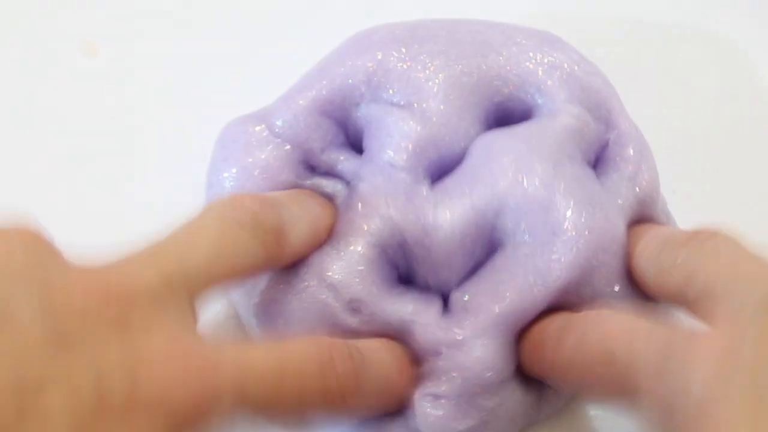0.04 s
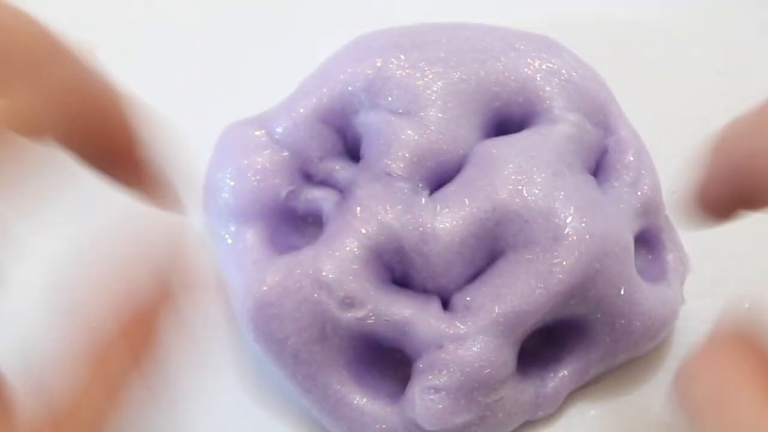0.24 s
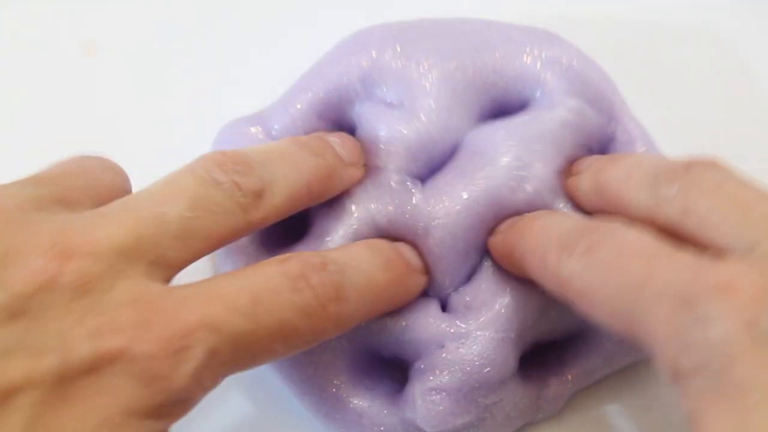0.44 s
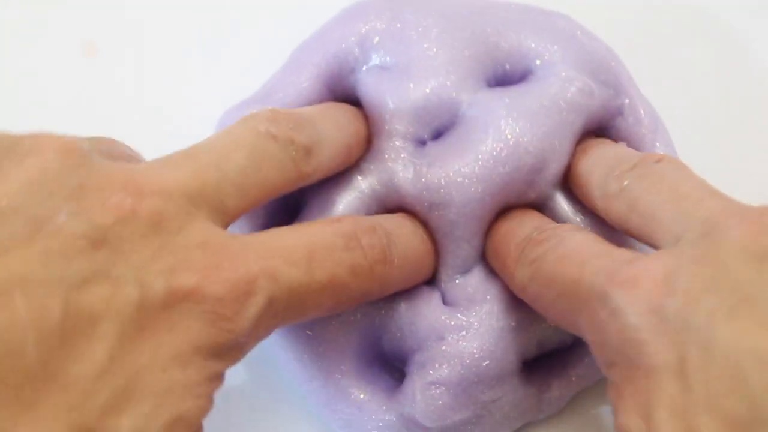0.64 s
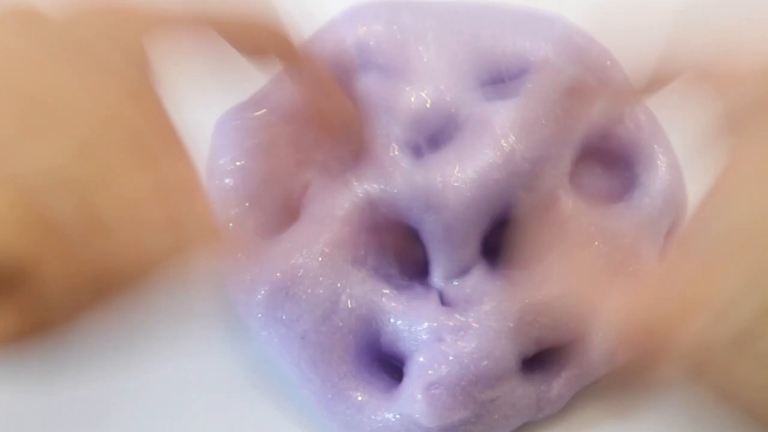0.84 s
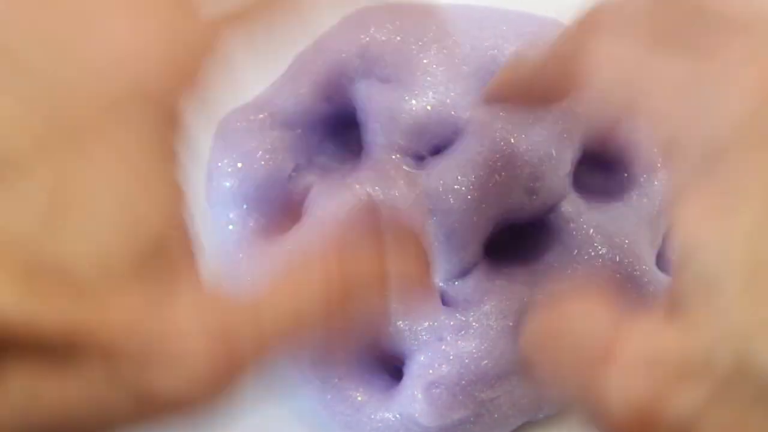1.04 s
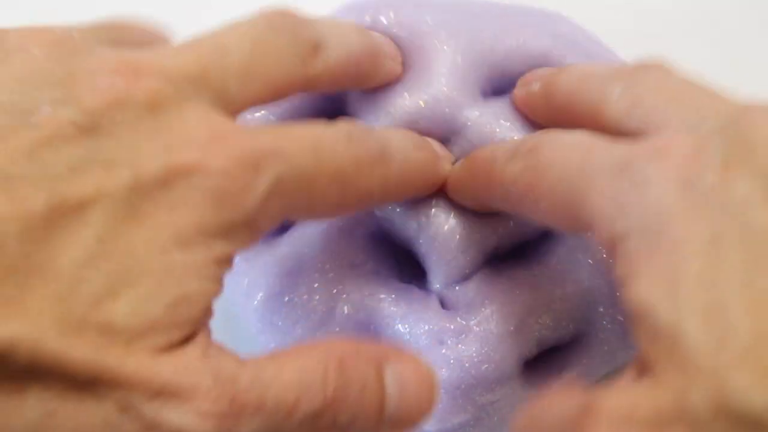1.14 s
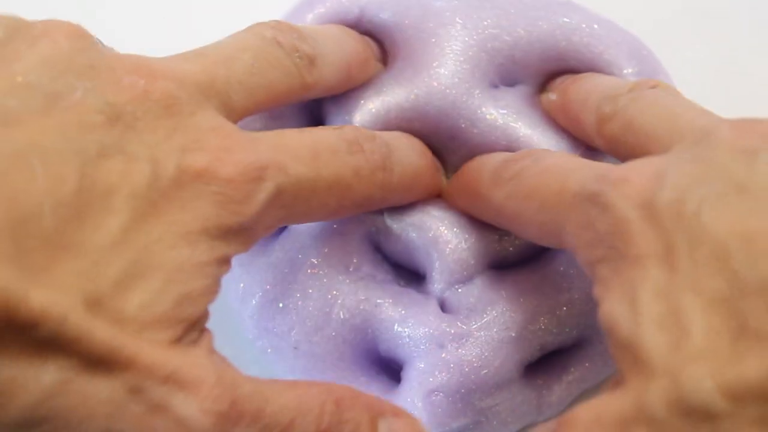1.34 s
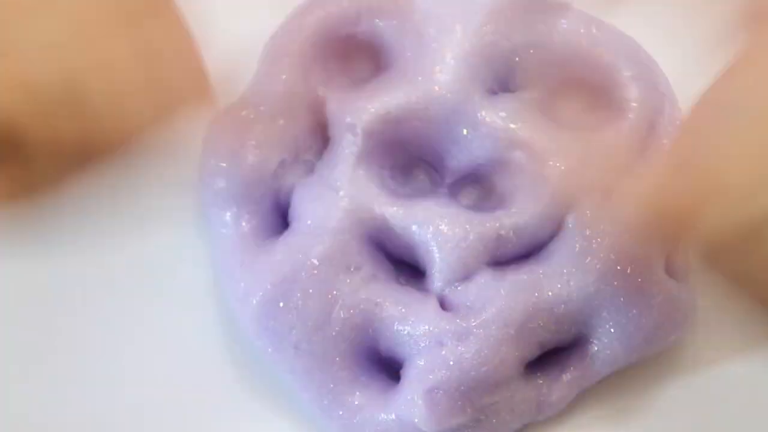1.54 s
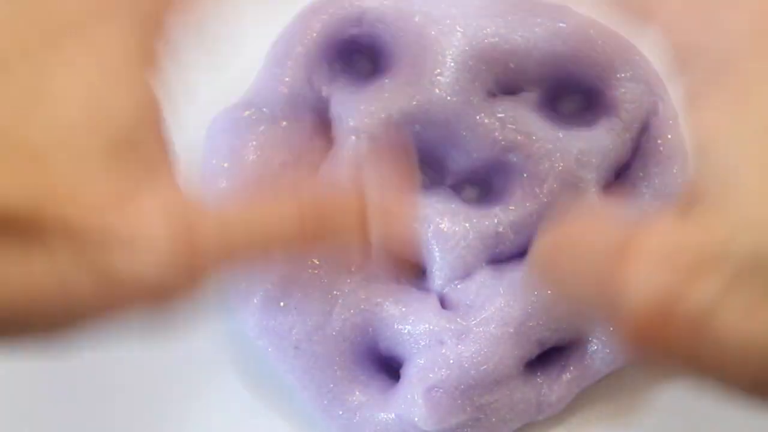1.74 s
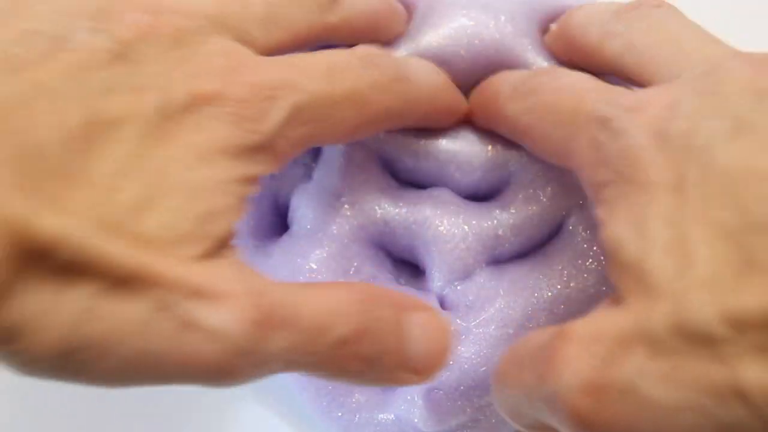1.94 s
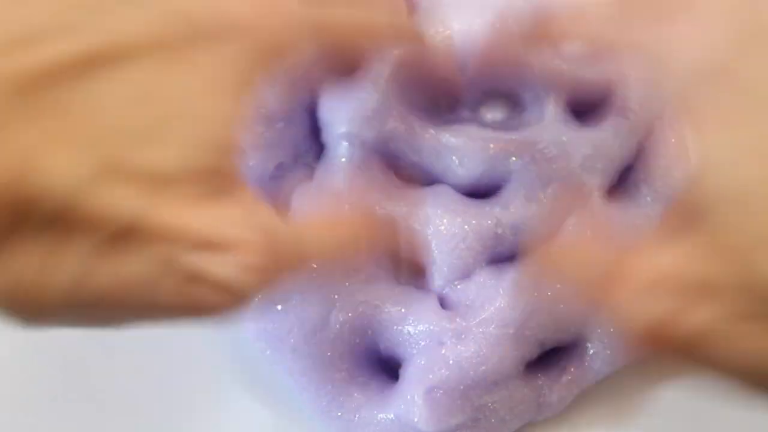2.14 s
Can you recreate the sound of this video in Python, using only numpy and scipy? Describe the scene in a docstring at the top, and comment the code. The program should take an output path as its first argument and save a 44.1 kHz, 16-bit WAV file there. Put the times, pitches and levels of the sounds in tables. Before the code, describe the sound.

Wet slime pops as fingers squeeze it, close to the microphone in a quiet room with faint noise and low hum. A loud, bubbly crackling burst comes at 0.2 s, a slight fizz at 0.6, a second sharp burst at 0.93, and a brighter, thinner fizz at 1.28. A softer, duller burst follows at 1.62, then tiny bubble ticks near 1.92 and a very faint fizz at 2.1. Each burst dies quickly.

```python
"""Faint room noise and a low hum come first, then fingers squeeze wet slime on a table, close by.
Three times an air pocket bursts: sharp pops with a swell of dense wet crackle that soon dies away.
The crackle is random clicks mixed with hiss, and hollows in the lump ring along as narrow resonances.
Around the bursts come weaker fizzes of the same crackle and single bubbles, each a short dying tone."""
import sys
import numpy as np
from scipy import signal
from scipy.fft import rfft, irfft, next_fast_len
from scipy.io import wavfile
from scipy.ndimage import uniform_filter1d

SR = 44100
rng = np.random.default_rng(int(sys.argv[2]) if len(sys.argv) > 2 else 0)


def file_out(sig):
    """Save sig as 16-bit WAV at sys.argv[1]."""
    # one column per channel
    cols = np.atleast_2d(sig).T
    # limit, then scale
    lim = np.clip(cols, -1, 1)
    pcm = np.round(lim * 32767).astype(np.int16)
    wavfile.write(sys.argv[1], SR, pcm)


N = 97020  # samples, 2.2 s
TOP_HZ = 16100  # nothing is kept above this


def amp(db):
    """Turn decibels into a gain."""
    return 10 ** (np.asarray(db) / 20)


def unit(x):
    """Scale a sound to an average (rms) level of 1."""
    return x / np.sqrt(np.mean(x ** 2) + 1e-20)


def filtered(x, response):
    """Multiply the spectrum of x by a response that depends on frequency."""
    size = next_fast_len(N + SR // 2)  # spare room so the end does not wrap round to the start
    spectrum = rfft(x, size) * response(np.fft.rfftfreq(size, 1 / SR))
    return irfft(spectrum, size)[..., :N]


def along(points, hz):
    """Read a curve of (pitch, value) points, with pitch on a log scale."""
    point_hz, values = np.transpose(points)
    return np.interp(np.log(hz + 1), np.log(point_hz + 1), values)


def coloured(x, colour):
    """Shape x with a spectrum curve, then scale it to rms 1."""
    return unit(filtered(x, lambda hz: amp(along(colour, hz))))


# Spectrum of the room noise: pitch_hz [Hz], relative level_db [dB per Hz]
ROOM_COLOUR = [(30, -41), (85, -33), (118, -11.5), (200, -9.5), (340, -7.5), (600, -12.5), (1000, -17),
               (3000, -22), (8000, -31), (11000, -39.5), (15500, -46.5)]
# Slow drift of the room noise: time_s [s], level_db [dB]
ROOM_LEVEL = [(0, -68.5), (.14, -68), (.45, -60.5), (.56, -63), (.76, -60.5), (.88, -62), (1.18, -61),
              (1.5, -63), (1.82, -59), (2.04, -64.5), (2.2, -63.5)]
HUM_HZ, HUM_DB = 118, -74  # the level is rms


def room():
    """Random noise, coloured and drifting in level, plus one steady low tone for the hum."""
    t = np.arange(N) / SR
    level_db = np.interp(t, *np.transpose(ROOM_LEVEL))
    noise = coloured(rng.standard_normal(N), ROOM_COLOUR) * amp(level_db)
    hum = amp(HUM_DB) * np.sqrt(2) * np.sin(2 * np.pi * HUM_HZ * t)
    return noise + hum


CRACKLE_PER_S = 5000  # average number of snaps per second
CRACKLE_SHARE = 0.5  # part of the power in snaps, the rest is hiss
SIZE_SPREAD_DB = 2  # how much the snaps differ in loudness


def crackle():
    """Countless tiny films snap, as random clicks, over the hiss of escaping air."""
    hits = rng.random(N) < CRACKLE_PER_S / SR
    directions = rng.choice([-1, 1], N)
    snaps = hits * directions * amp(SIZE_SPREAD_DB * rng.standard_normal(N))
    hiss = rng.standard_normal(N)
    return np.sqrt(CRACKLE_SHARE) * unit(snaps) + np.sqrt(1 - CRACKLE_SHARE) * hiss


# The lows crest later and have further to rise
BASS_LAG_S, BASS_SWELL_DB, BASS_HZ = 0.039, 19.5, 343
# The top falls faster (extra dB/s), and its late, steeper fade begins sooner
TREBLE_FALL, TREBLE_HZ, TREBLE_EARLY_S = 150, 9900, 0.04
# Some time after the crest the sound fades faster (extra dB/s)
LATE_AFTER_S, LATE_FALL = 0.1, 159


def swell(start, crest, swell_db, fall, hz):
    """Loudness of one band: a sudden start, a rise to the crest, then a fall that quickens."""
    t = np.arange(N) / SR
    low = 1 / (1 + (hz / BASS_HZ) ** 2)  # near 1 in the bass
    high = 1 / (1 + (TREBLE_HZ / hz) ** 8)  # near 1 in the treble
    crest = max(crest + BASS_LAG_S * low, start + 0.002)
    to_crest = np.clip((crest - t) / (crest - start), 0, 1)
    rise_db = (swell_db + BASS_SWELL_DB * low) * to_crest
    late_start = crest - BASS_LAG_S * low + LATE_AFTER_S - TREBLE_EARLY_S * high
    fall_db = (fall + TREBLE_FALL * high) * np.maximum(t - crest, 0)
    fall_db += LATE_FALL * np.maximum(t - late_start, 0)
    onset = np.clip((t - start) / 0.0012, 0, 1)
    return onset * amp(-rise_db - fall_db)


def air_escape(row, colour, count=20):
    """Air breaks out of the slime: coloured crackle, split into bands that each swell and die."""
    start, crest, level_db, swell_db, fall = row
    source = coloured(crackle(), colour)
    centres = np.geomspace(100, 15000, count)
    # each band is a triangle around its centre, so together they add up to the source
    bands = filtered(source, lambda f: np.array([np.interp(f, centres, w) for w in np.eye(count)]))
    shaped = [band * swell(start, crest, swell_db, fall, hz) for band, hz in zip(bands, centres)]
    return amp(level_db) * sum(shaped)


# Small fizzes: start_s [s], crest_s [s], level_db [dB], swell_db [dB], base fall_db_per_s [dB/s]
FIZZES = [(0.578, 0.611, -50.5, 6, 265), (1.261, 1.297, -33.5, 21, 277), (1.585, 1.611, -42, 23, 400),
          (2.082, 2.097, -56, 7, 194)]
# Spectrum of each fizz: pitch_hz [Hz], relative level_db [dB per Hz]
FIZZ_COLOURS = [
    [(1500, -27), (3000, -12.5), (4200, 1.5), (6500, -6.5), (8500, -10.5), (12000, -7), (15800, -10)],
    [(1500, -19.5), (2300, -8), (3500, 0), (5500, -10), (7800, -4), (11000, -8), (15800, -9.5)],
    [(2000, -21), (3200, -1), (5000, -4), (7000, -1), (15800, -15)],
    [(3000, -27), (5500, -5), (7000, 1.5), (10000, -3), (15800, 0)],
]


def fizzes():
    """Small bubbles fizz under the fingers: weaker escapes of air with mostly high crackle."""
    return sum(air_escape(row, colour) for row, colour in zip(FIZZES, FIZZ_COLOURS))


# Single bubbles: start_s [s], peak_db [dB, before the room tail], pitch_hz [Hz],
# life_cycles [cycles for the tone to drop 60 dB], crack_db [dB, noise against tone before filtering]
BUBBLES = [(0.1886, -30.5, 1181, 41, -18), (.1893, -34, 420, 22, -4), (0.193, -14.5, 2710, 4.3, -19.5),
           (0.2154, -9, 1500, 2.9, 0.5), (0.2189, -8, 4520, 5.4, -8.5), (0.2212, -7, 4666, 5, -7),
           (0.2381, -5, 1370, 2.4, -4), (.2490, -5.5, 2846, 4.3, -12), (0.2587, -11.5, 453, 6.9, -11.5),
           (.2604, -13, 1060, 7, -11), (0.263, -7.5, 1520, 9, -12.5), (.529, -53, 6000, 4.7, -12),
           (.6186, -16, 5390, 5.3, -7), (0.6258, -28, 5900, 3.1, -10.5), (.9150, -17, 5300, 6.8, -9.5),
           (0.9263, -12, 4300, 7, -13), (0.9273, -4.5, 4364, 6.6, -13), (0.9614, -9, 3980, 7.4, -10),
           (1.262, -47, 5000, 6.3, -10), (1.4006, -32.5, 8770, 5.43, -7), (1.6076, -26, 2960, 4, -1),
           (1.6107, -16, 554, 2.7, -3.5), (1.9164, -39.5, 3000, 4, -20.5), (1.9171, -47, 1195, 7.6, -26.5),
           (1.939, -46.5, 1153, 6, -8.5)]
CRACK_S, ROOM_T60_S = 0.0044, 0.1  # time for the crack and the room tail to drop 60 dB
POP_ROOM_DB = -4.5  # level of the room tail
POP_LOW_EDGE, POP_HIGH_EDGE = 0.61, 5  # a bubble radiates between these multiples of its pitch


def pops():
    """Each bubble cracks, rings for a few cycles and leaves a short room tail."""
    out = np.zeros(N + SR)
    t = np.arange(SR // 4) / SR
    for start, peak_db, hz, cycles, crack_db in BUBBLES:
        tone = np.sin(2 * np.pi * hz * t) * amp(-60 * t * hz / cycles)
        crack = amp(crack_db - 60 * t / CRACK_S) * rng.standard_normal(len(t))
        edges = [min(hz * POP_LOW_EDGE, SR / 4), min(hz * POP_HIGH_EDGE, TOP_HZ)]
        band = signal.butter(2, edges, "band", fs=SR, output="sos")
        pop = signal.sosfilt(band, tone + crack)
        pop *= amp(peak_db) / np.abs(pop).max()
        tail = rng.standard_normal(len(t)) * amp(-60 * t / ROOM_T60_S)
        echo = signal.fftconvolve(pop, tail / np.linalg.norm(tail))[:len(t)]
        first = round(start * SR)
        out[first:first + len(t)] += pop + amp(POP_ROOM_DB) * echo
    return out[:N]


def ring(x, hz, width_hz):
    """Pass x through one steep resonance and scale it to rms 1."""
    def response(f):
        damping = 1j * f * width_hz
        return (damping / (hz * hz - f * f + damping)) ** 2
    return unit(filtered(x, response))


# Hollows that ring: start_s [s], crest_s [s], pitch_hz [Hz], width_hz [Hz],
# level_db [dB at the crest], swell_db [dB], base fall_db_per_s [dB/s]
CAVITIES = [(0.212, 0.247, 1138, 86, -22.5, 1, 155), (0.209, 0.25, 2654, 720, -26.5, -1, 189.5),
            (0.241, 0.276, 143.5, 14.7, -41, 10.5, 108.5), (0.249, 0.295, 283, 38, -35, 7, 174),
            (0.245, 0.256, 417, 91, -29, 8, 130.5), (0.926, .968, 1425, 770, -27, 21, 130.5),
            (0.918, 0.963, 4540, 1800, -25, 13, 134), (0.931, 0.977, 329.7, 23, -34.5, 14, 118),
            (1.27, 1.305, 4240, 680, -49.5, 7, 189.5), (1.61, 1.655, 2410, 360, -32.5, 17.5, 168),
            (1.615, 1.666, 269.3, 39, -34.5, 22, 208), (1.605, 1.669, 142, 22, -43, 6.5, 146)]


def cavities():
    """Finger holes and hollows in the lump ring under the crackle, each at its own pitch."""
    t = np.arange(N) / SR
    out = np.zeros(N)
    for start, crest, hz, width_hz, level_db, swell_db, fall in CAVITIES:
        tone = ring(crackle(), hz, width_hz)
        # even out the random ups and downs so that the swell shapes the loudness
        power = np.abs(uniform_filter1d(tone ** 2, size=1300))
        tone = unit(tone / np.sqrt(power + 1e-6))
        rise_db = swell_db * np.clip((crest - t) / (crest - start), 0, 1)
        fall_db = fall * np.maximum(t - crest, 0)
        fall_db += LATE_FALL * np.maximum(t - crest - LATE_AFTER_S, 0)
        onset = np.clip((t - start) / 0.0036, 0, 1)
        out += tone * onset * amp(level_db - rise_db - fall_db)
    return out


# Big bursts: start_s [s], crest_s [s], level_db [dB], swell_db [dB], base fall_db_per_s [dB/s]
BURSTS = [(0.21, 0.249, -15, 6.5, 185), (0.91, 0.958, -15.5, 21, 203.5), (1.606, 1.641, -21.5, 18, 209.5)]
# Spectrum of each burst: pitch_hz [Hz], relative level_db [dB per Hz]
BURST_COLOURS = [
    [(35, -67), (60, -40), (135, -8), (187, -17.5), (433, -9), (738, -7.5), (1100, -4), (1830, -12),
     (2590, -7.5), (3670, -12), (4520, -12), (8090, -13.5), (15500, -27.5)],
    [(35, -73), (60, -38), (129, -12.5), (206, -12.5), (327, -6), (453, -5.5), (559, -1.5), (721, -3.5),
     (1320, -7), (2360, -10.5), (5320, -7), (9080, -13), (15500, -35.5)],
    [(35, -75), (60, -63), (129, -8), (196, -22), (266, -1), (305, -12.5), (756, -11.5), (1100, -9),
     (1870, -14.5), (2310, -8), (3270, -12.5), (9300, -24.5), (15500, -42)],
]


def bursts():
    """Large air pockets give way: full, loud crackle with its lows cresting last."""
    return sum(air_escape(row, colour) for row, colour in zip(BURSTS, BURST_COLOURS))


def scene():
    """Add all the sounds, the same in both channels."""
    mono = room() + fizzes() + pops() + cavities() + bursts()
    return np.array([mono, mono])


def record(dry):
    """The recorder thins the deep bass and keeps nothing above its top limit."""
    bass_cut = signal.butter(2, 90, "high", fs=SR, output="sos")
    thin = signal.sosfilt(bass_cut, dry)
    return filtered(thin, lambda hz: np.clip((TOP_HZ - hz) / 400, 0, 1) ** 2)


dry = scene()
out = record(dry)
file_out(out)
```